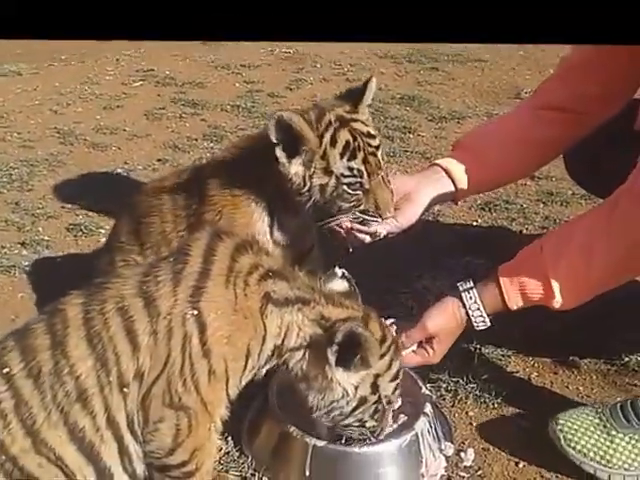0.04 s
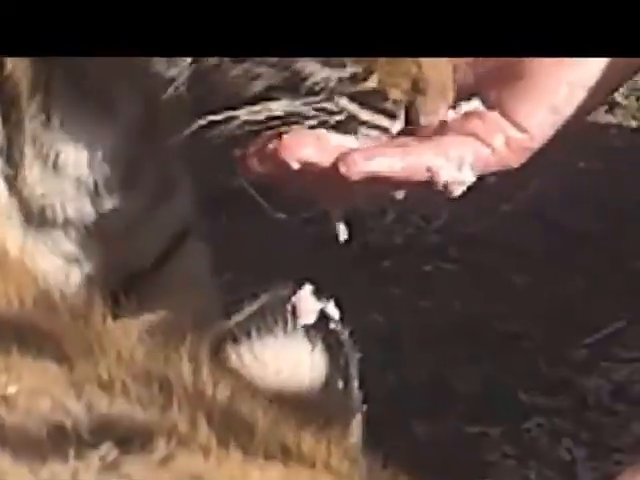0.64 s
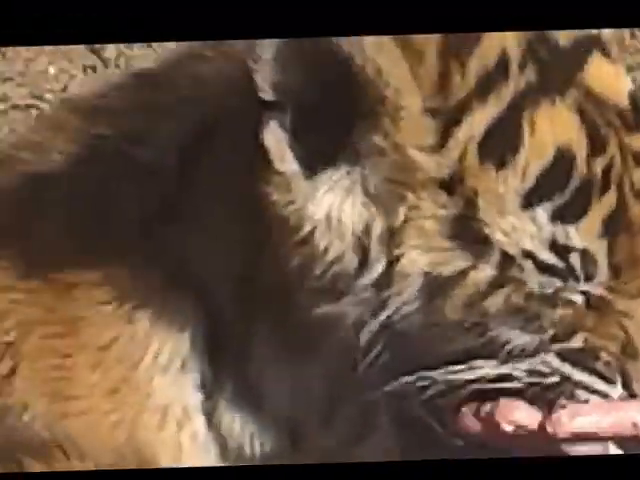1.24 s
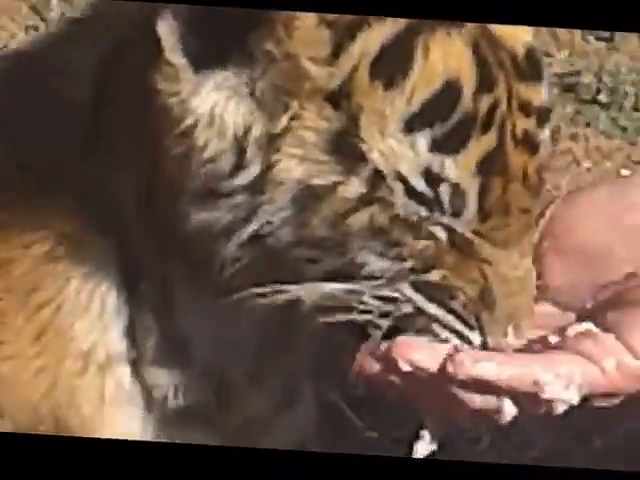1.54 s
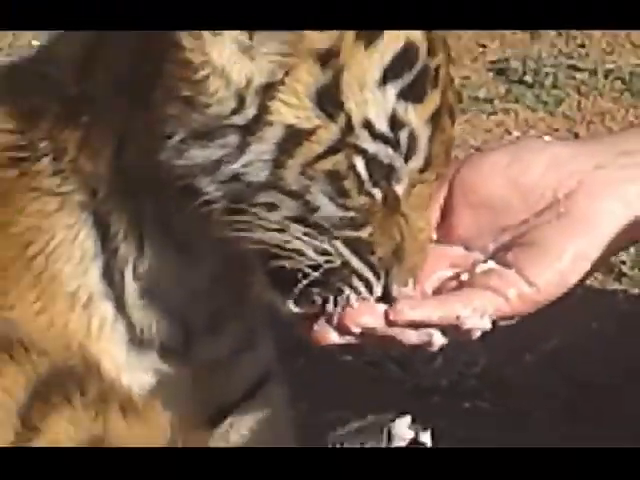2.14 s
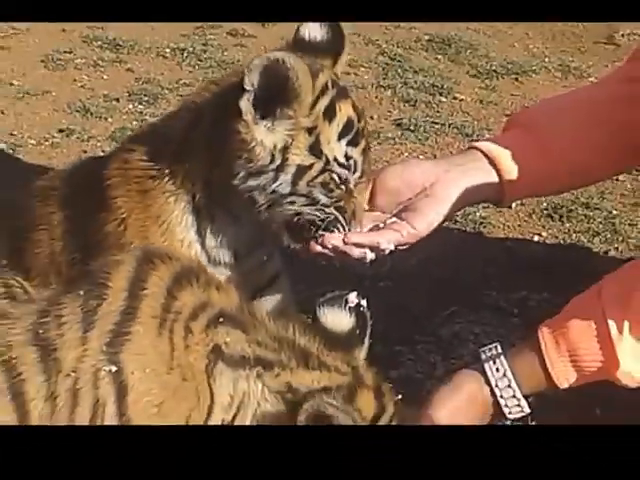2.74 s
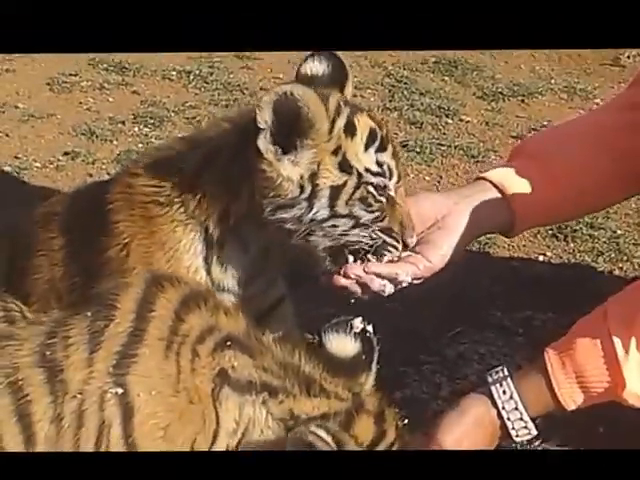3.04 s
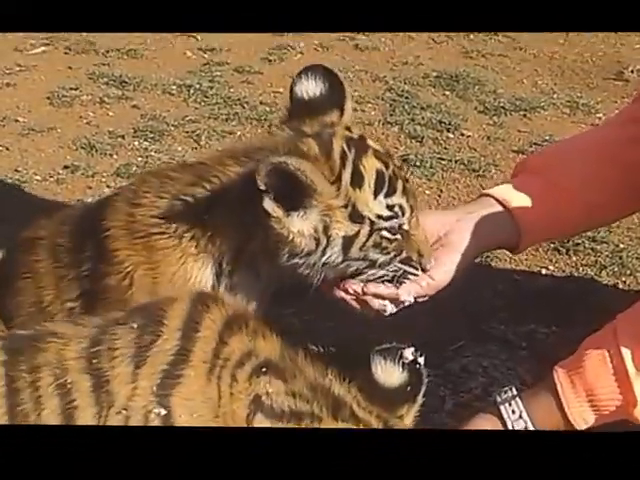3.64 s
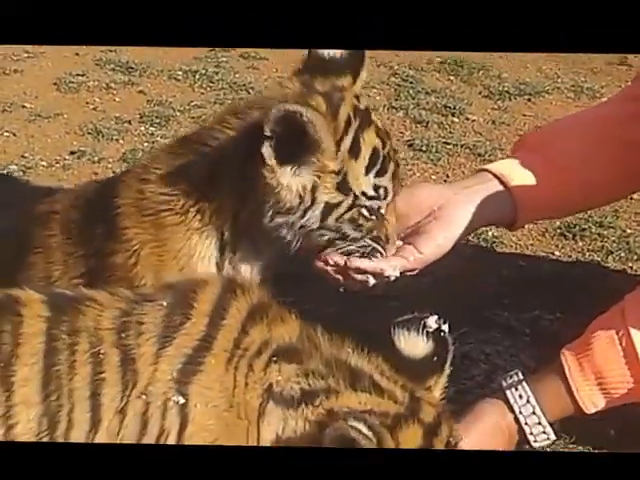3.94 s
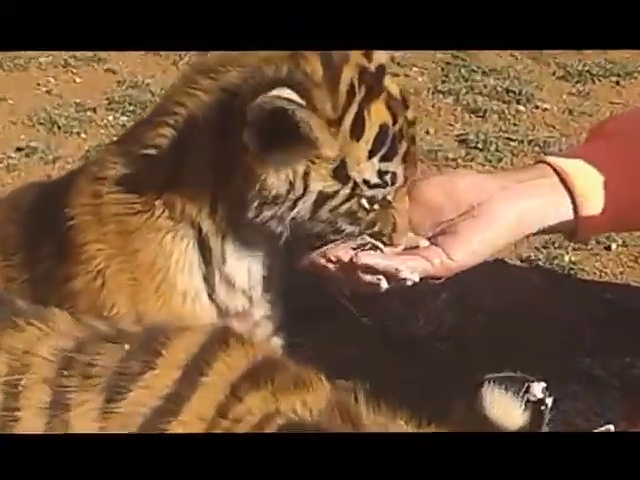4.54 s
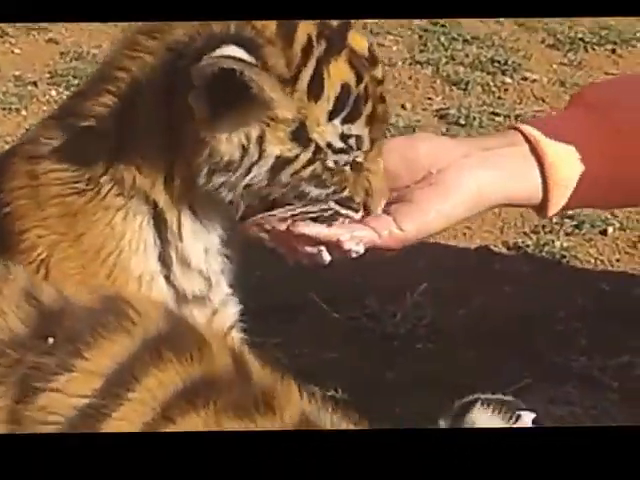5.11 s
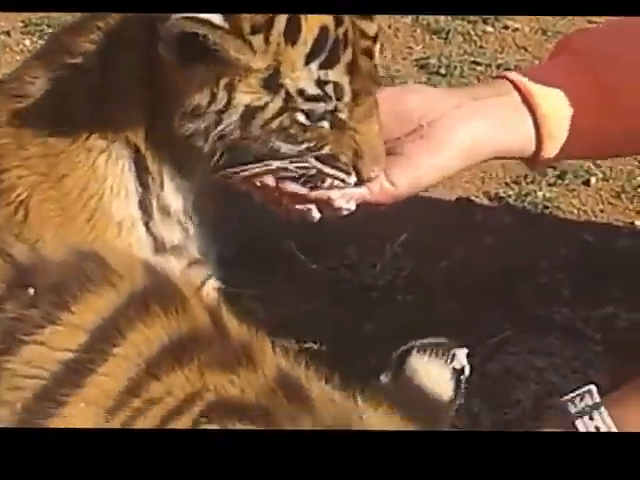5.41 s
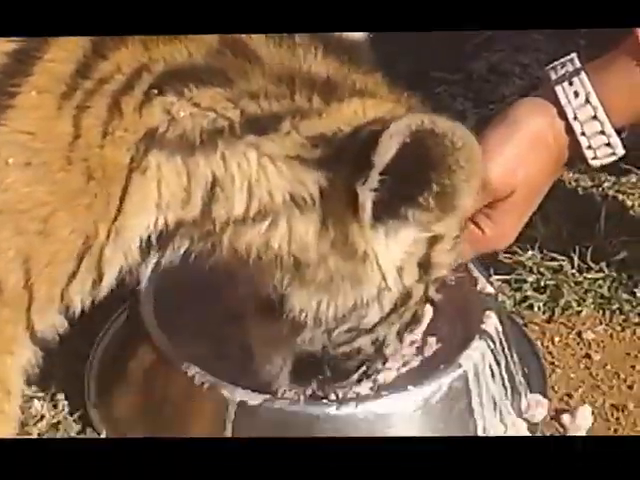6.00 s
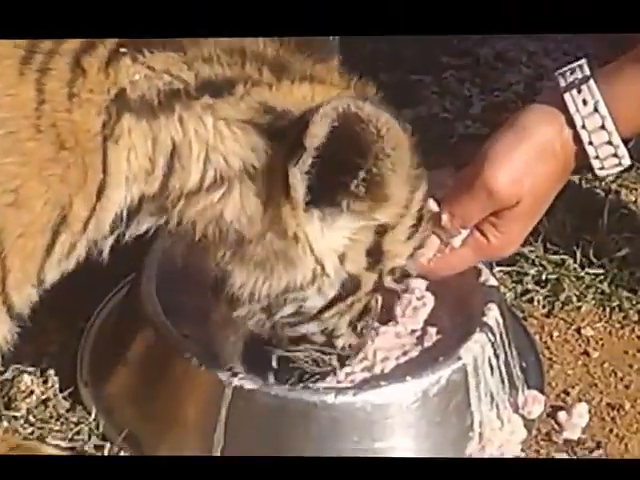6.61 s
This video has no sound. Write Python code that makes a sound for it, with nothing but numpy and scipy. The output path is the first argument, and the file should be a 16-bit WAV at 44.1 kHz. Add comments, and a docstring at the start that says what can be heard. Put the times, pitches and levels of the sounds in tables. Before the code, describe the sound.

Two tiger cubs moan and growl low while eating, with faint wet chewing clicks and a few harsh bird chirps outdoors.

```python
"""Outdoors, two tiger cubs feed on minced meat and growl, at times both at once.
One moans in an almost pure tone that frays at its end; the other growls lower and buzzier,
breaking into rasps as its vocal folds beat irregularly. Wet films snap in their mouths as clicks,
squelches and crackle, and air hisses over their teeth. Over a soft bed of air, a bird nearby gives
four harsh chirps, each two overlapping notes from the two sides of its syrinx."""
import sys
import numpy as np
from scipy import signal
from scipy.fft import rfft, irfft, next_fast_len
from scipy.io import wavfile
from scipy.ndimage import uniform_filter1d, map_coordinates

SR = 44100
rng = np.random.default_rng(int(sys.argv[2]) if len(sys.argv) > 2 else 0)


def persist_wave(psi):
    """Save psi, clipped to +-1, as 16-bit WAV."""
    counts = np.round(np.clip(psi, -1, 1) * 32767).astype(np.int16)
    wavfile.write(sys.argv[1], SR, np.atleast_2d(counts).T)


N = 298116

# Noise colours. Each row: frequency in Hz, relative level in dB.
AIR_COLOUR = [(15, -26), (25, -3.5), (71, 0), (148, 2), (233, -1.5), (350, -7), (941, -14), (1180, -19),
              (1310, -16.5), (2010, -19), (3350, -19), (4420, -23), (10800, -23), (14000, -77),
              (22000, -120)]  # the outdoor bed
RASP_COLOUR = [(120, -44), (180, 24), (225, 5), (285, 0.5), (350, 9), (410, 4), (520, 3), (680, 3),
               (820, -1.5), (1070, 3), (1330, -5.5), (1650, -16), (2500, -15), (5000, -34.5)]  # turbulence in the throat
TEETH_COLOUR = [(1060, -2.5), (1800, -3), (2290, -3), (2900, -4.5), (3750, -5), (6180, -8), (10400, -14),
                (10800, -20), (14000, -69), (22000, -120)]  # air over teeth and wet meat
# The cubs' phrases, one table each. Each row: time in seconds, pitch in Hz, fundamental level in dB,
# mouth level in dB before the phrase's trim.
FIRST_GROWL = [(0.01, 143.2, -26, -51), (.085, 134.3, -39.5, -59), (.12, 137.5, -31.5, -53),
               (.19, 134.2, -43, -59.5), (.24, 136, -38.5, -53.5), (.44, 124.5, -48.5, -52.5),
               (.545, 105.6, -34, -55.5), (.59, 104.7, -54, -68), (.72, 111.3, -53, -70)]
LONG_GROWL = [(2.58, 131.2, -59, -75.5), (2.672, 142.4, -39.5, -60.5), (2.76, 156.4, -29.5, -46.5),
              (2.834, 164.9, -38.5, -59), (2.878, 177.9, -36, -59), (2.96, 176.2, -37.5, -61.5),
              (2.976, 168.2, -37.5, -56.5), (3.046, 170, -36, -57), (3.074, 172.4, -33, -59.5),
              (3.234, 157.2, -25.5, -52), (3.366, 151.5, -27, -52.5), (3.666, 136, -38, -41.5),
              (3.69, 133.6, -49, -41.5), (3.72, 134.2, -31, -55.5)]
LAST_GROWL = [(5.4, 130.1, -56, -66), (5.57, 142.8, -38, -53.5), (5.65, 144.6, -40, -52),
              (5.88, 134.8, -44.5, -51.5), (5.98, 127.1, -43, -59.5), (6.07, 109.9, -37.5, -56),
              (6.15, 107, -36, -59.5), (6.26, 92.9, -47.5, -58)]
FIRST_MOAN = [(0.02, 207.4, -41, -65.5), (0.152, 206.7, -45.5, -57), (0.2, 187.0, -43.5, -54),
              (0.278, 196.7, -34.5, -46.5), (0.432, 189.8, -34, -51), (0.676, 167, -32, -60),
              (0.772, 154.4, -44.5, -60.5), (0.83, 150.1, -31, -56), (0.992, 143.6, -30, -60.5),
              (1.196, 142.4, -31, -56.5), (1.292, 150.5, -35.5, -54.5), (1.39, 146, -34, -56.5),
              (1.435, 140.2, -50, -65)]
SECOND_MOAN = [(4.32, 127.7, -74, -96), (4.368, 135.7, -53, -71), (4.41, 139.8, -44.5, -76),
               (4.488, 154.6, -40, -72), (4.518, 161.7, -50, -79), (4.622, 182.8, -38.5, -68),
               (4.704, 185, -58.5, -69.5), (4.88, 178.8, -58, -72.5), (4.92, 182.4, -59, -66.5)]
MOAN_AFTER_BREAK = [(4.94, 230.2, -49, -76), (4.956, 233, -46, -63), (5.146, 233.2, -41, -63),
                    (5.35, 226.9, -36.5, -58.5), (5.402, 199.8, -37, -60), (5.5, 187, -32, -60.5),
                    (5.724, 170.6, -32.5, -66), (5.834, 154.7, -41, -57.5), (5.96, 148.6, -29, -61.5),
                    (6.078, 145, -31, -58.5), (6.378, 145.3, -35, -58.5), (6.4, 149, -38, -58)]  # the second moan goes on after the voice breaks upward
# Spells of irregular fold beats. Each row: start in seconds, end in seconds, added roughness from 0 to 1.
GROWL_SPELLS = [(0, .53, 0.436), (2.8, 3.11, 0.84), (3.73, 4.1, 0.57), (5.38, 5.98, 0.059),
                (5.98, 6.3, 0.27)]
MOAN_SPELLS = [(0, .22, 0.57), (1.3, 1.41, 0.22), (1.41, 1.95, 0.61), (6.39, 6.8, 0.59)]
# Catches in which the throat briefly booms. Each row: time in seconds, boost in dB.
GROWL_BOOMS = [(2.99, 5.8), (3.16, 9.4), (3.79, 2.7), (3.88, 9.9)]
MOAN_BOOMS = [(1.23, 0), (1.53, 4.5), (6.25, 6)]
# Resonances of the cubs' throats and mouths and the bird's beak. Each row: frequency in Hz, gain in dB.
GROWL_THROAT_EQ = [(160, -38), (190, -9.5), (225, 2), (280, 7.5), (345, 7), (410, -3), (470, -9),
                   (560, -23), (700, -39.5)]
GROWL_MOUTH_EQ = [(400, -16), (470, -9), (560, -20), (625, -11), (668, 9), (700, 3), (740, -1), (800, -15),
                  (890, -17), (990, 0), (1085, 4.5), (1175, -3), (1240, -2), (1340, -4), (1550, -13),
                  (1900, -13), (2300, -26), (3000, -38)]
MOAN_THROAT_EQ = [(160, -31), (190, -14), (225, 11), (285, -2.5), (355, 4.5), (410, 0.5), (450, -11.5),
                  (560, -30), (700, -36.5)]
MOAN_MOUTH_EQ = [(440, -3.5), (590, -11), (700, -13), (790, -5.5), (900, -7.5), (1060, -2.5), (1170, -8),
                 (1300, -12), (1500, -10.5), (2000, -51), (3000, -44)]
BEAK_EQ = [(1000, -20), (1600, 1), (2350, 1.5), (2900, 3.5), (3900, 4.5), (4700, 3), (5500, 2.5),
           (6800, -0.5), (7700, -7), (8500, -12.5), (10000, -19)]
# The bird's chirps. Each row: start in seconds, level in dB, pitch ratio.
CHIRP_CUES = [(0.009, -43, .94), (0.54, -41.5, 0.99), (1.093, -43, 1.02), (1.754, -44.5, 0.97)]
# The two sides of the syrinx. Each row: time into the chirp in seconds, pitch in Hz before the chirp's
# ratio, relative level in dB, roughness from 0 to 1.
LEAD_NOTE = [(0, 1050, -16, .4), (.01, 1290, -6, .3), (.023, 1400, 0, .22), (.034, 1240, -1, .3),
             (.044, 1050, -1, .5), (.056, 830, -9, .7), (.066, 780, -40, .9)]
LAG_NOTE = [(.022, 1250, -30, .8), (.038, 1370, -7, .6), (.053, 1290, -1, .25), (.063, 1130, -3, .35),
            (.073, 1020, -10, .6), (.095, 950, -32, .9)]
# Squelches and licks. Each row: start and length in seconds, level in dB, centre in Hz, width in octaves.
LICK_CUES = [(0.451, 0.1, -54.5, 6640, 1), (1.546, 0.056, -65.5, 3630, 0.54),
             (2.122, 0.067, -75, 3270, 0.17), (2.26, 0.054, -66.5, 1100, 0.83),
             (2.406, 0.076, -71, 4670, 0.22), (2.58, 0.069, -71, 3100, 0.17),
             (4.02, 0.057, -63, 2270, 0.66), (4.221, 0.087, -71, 4800, 0.089),
             (4.956, 0.038, -54.5, 2260, 0.45), (5.169, 0.066, -58, 6200, 0.82),
             (5.819, 0.27, -60.5, 4470, 0.56), (6.055, 0.049, -57, 6500, 0.4)]
# Grumbles that end the moans and the long growl. Each row: start and length in seconds, pitch in Hz,
# share by which the pitch sinks, fundamental level in dB, mouth level in dB before the trim.
MOAN_TAILS = [(1.425, 0.37, 141.5, .04, -51, -56), (1.658, .13, 134.2, 0.28, -51, -71),
              (1.804, 0.15, 102.9, 0.051, -63, -66), (6.408, 0.23, 133, 0.025, -52, -55.5),
              (6.599, 0.12, 135.5, .27, -46, -61)]
GROWL_TAILS = [(3.7, 0.13, 120.1, .05, -36, -53), (3.8, 0.15, 115.1, 0.0068, -38.5, -53),
               (3.92, 0.14, 109.3, .06, -43, -60.5), (4.068, 0.29, 96.3, .04, -62, -77)]
# Tongue and lip clicks. Each row: start in seconds, peak level in dB, cavity resonance in Hz.
CLICK_CUES = [(2.0482, -57, 3100), (2.1146, -54, 3300), (2.14, -54, 3630), (2.3845, -53, 3760),
              (2.5768, -53, 3650), (2.602, -49.5, 3210), (4.0057, -42.5, 2060), (4.0233, -48, 2693),
              (4.0835, -48.5, 1850), (4.162, -50.5, 1720), (4.5248, -45.5, 2300), (4.9602, -46, 2160),
              (5.6057, -41, 1950)]


def amp(db):
    """Decibels as a linear gain."""
    return 10 ** (np.asarray(db) / 20)


def unit(x):
    """x at rms 1."""
    return x / np.sqrt(np.mean(x ** 2) + 1e-20)


def eq_gain(points, hz):
    """Linear gain of an EQ curve of (Hz, dB) points, read on a log frequency axis."""
    freqs, db = np.transpose(points)
    return amp(np.interp(np.log(hz + 1), np.log(freqs + 1), db))


def curves(rows, t):
    """Each column after the time, read at the times t."""
    times, *columns = np.transpose(rows)
    return [np.interp(t, times, column) for column in columns]


def wobble(rate, n):
    """A smooth random curve of n samples, with rate knots a second."""
    knots = rng.standard_normal(int(n * rate / SR) + 4)
    grid = np.arange(10 * len(knots)) / 10
    return np.interp(np.arange(n) * rate / SR, grid, map_coordinates(knots, [grid]))


def filtered(x, response):
    """x through a filter whose gain is response(Hz)."""
    size = next_fast_len(len(x) + 8192)
    return irfft(rfft(x, size) * response(np.fft.rfftfreq(size, 1 / SR)), size)[:len(x)]


def equalised(x, points):
    """x through an EQ curve of (Hz, dB) points."""
    return filtered(x, lambda hz: eq_gain(points, hz))


def coloured(x, points):
    """x through an EQ curve, at rms 1."""
    return unit(equalised(x, points))


def blend(tone, noise, share):
    """Equal-power crossfade from tone to noise."""
    share = np.clip(share, 0, 1)
    return np.sqrt(1 - share) * tone + np.sqrt(share) * noise


def add(track, start, sound):
    """Mix a sound into the track at start seconds."""
    part = track[max(0, round(start * SR)):][:len(sound)]
    part += sound[:len(part)]


def outdoor_air():
    """A soft, steady bed of noise, weighted to the low end."""
    return amp(-62.5) * coloured(rng.standard_normal(N), AIR_COLOUR)


def roughness(spells, t, calm=0.019, turn_s=0.019):
    """The folds slip into each rough spell and out of it again."""
    step = lambda s: .5 + .5 * np.tanh((t - s) / turn_s / 2)
    return np.clip(calm + sum(depth * (step(start) - step(end)) for start, end, depth in spells), 0, 1)


def cub_voice(phrase, spells, booms, throat_eq, mouth_eq, throat_trim_db, mouth_trim_db,
              buzz_db, rasp_db, mouth_leak, throat_leak, jitter, flutter_rate):
    """Vocal folds beat at the pitch, and stumble and hiss as they turn rough."""
    fade_s, boom_width_s = .015, .021
    start, end = phrase[0][0] - fade_s, phrase[-1][0] + fade_s
    t = np.arange(max(start, 0), end, 1 / SR)
    n = len(t)
    pitch, low_db, mouth_db = curves(phrase, t)
    rough = roughness(spells, t)
    phase = 2 * np.pi * np.cumsum(pitch * (1 + (0.0041 + jitter * rough) * wobble(120, n))) / SR

    def partial(k):
        """Irregular beats smear harmonic k into sidebands."""
        scatter = (wobble(flutter_rate, n) + 1j * wobble(flutter_rate, n)) / np.sqrt(2)
        flutter = np.sqrt(1 - rough ** 2) + rough * scatter
        return np.sqrt(2) * np.imag(flutter * np.exp(1j * k * phase))

    def puffs(colour):
        """Air escapes in one puff a cycle."""
        return coloured((1 + 0.53 * np.cos(phase)) * rng.standard_normal(n), colour)

    # the throat favours whichever low harmonic is nearest its resonance
    weights = {k: eq_gain(throat_eq, k * pitch) for k in range(2, 5)}
    hum = sum(w * partial(k) for k, w in weights.items())
    hum /= np.sqrt(sum(w ** 2 for w in weights.values()))
    throat = blend(hum, 0.77 * puffs(throat_eq), throat_leak + 0.68 * rough)
    # its level mostly rides the mouth's, and swells when rough
    throat_db = throat_trim_db + 0.2 * low_db + 0.8 * mouth_db + 10.5 * rough
    throat_db += sum(db * np.exp(-.5 * ((t - s) / boom_width_s) ** 2) for s, db in booms)
    # higher harmonics light up as they glide through the mouth's resonances
    buzz = np.zeros(n)
    for k in range(3, 18):
        jaw = amp(2.6 * wobble(12, n))  # chewing sways each harmonic's level
        blur = rng.uniform(0, 2 * np.pi) + .035 * k * wobble(110, n)  # no two beats are quite alike
        buzz += eq_gain(mouth_eq, k * pitch) * jaw * np.sin(k * phase + blur)
    mouth = blend(amp(buzz_db) * buzz, amp(rasp_db) * puffs(RASP_COLOUR), mouth_leak + 0.71 * rough)
    voice = amp(low_db) * partial(1) + amp(throat_db) * throat + amp(mouth_db + mouth_trim_db) * mouth
    throb_hz = 24 * (1 + 0.13 * wobble(8.36, n))
    throb = amp(2.4 * rough * np.sin(2 * np.pi * np.cumsum(throb_hz) / SR))
    fade = np.clip(np.minimum(t - start, end - t) / fade_s, 0, 1)
    out = np.zeros(N)
    add(out, t[0], fade * throb * voice)
    return out


def growl(phrase, throat_trim_db, mouth_trim_db):
    """The growler's more open mouth lets a buzz of harmonics out."""
    return cub_voice(phrase, GROWL_SPELLS, GROWL_BOOMS, GROWL_THROAT_EQ, GROWL_MOUTH_EQ,
                     throat_trim_db, mouth_trim_db, buzz_db=-6.5, rasp_db=10,
                     mouth_leak=0.0041, throat_leak=0.023, jitter=0.0303, flutter_rate=70)


def moan(phrase, throat_trim_db, mouth_trim_db):
    """The moaner's mouth is nearly shut: mostly fundamental, with a breathy edge."""
    return cub_voice(phrase, MOAN_SPELLS, MOAN_BOOMS, MOAN_THROAT_EQ, MOAN_MOUTH_EQ,
                     throat_trim_db, mouth_trim_db, buzz_db=-0.5, rasp_db=4.5,
                     mouth_leak=0.31, throat_leak=0.56, jitter=0.035, flutter_rate=64)


def teeth_hiss(voices):
    """Air over teeth and wet meat: a grainy hiss that grows with the sound leaving the mouths."""
    mouth_band = coloured(voices, [(350, -40), (600, 0)])
    power = np.abs(uniform_filter1d(mouth_band ** 2, size=SR // 10))
    effort_db = 10 * np.log10(power + amp(-92))
    grains = rng.standard_normal(N) * amp(2.4 * wobble(700, N))
    return amp(-64 + 0.36 * effort_db) * coloured(grains, TEETH_COLOUR)


def saliva_crackle(snaps_per_s=20, t60=0.024):
    """Threads of saliva snap at random while the cubs chew."""
    out, t = np.zeros(N), np.arange(SR // 50) / SR
    for when, softness in rng.random((round(snaps_per_s * N / SR), 2)):
        db = -53.5 - 2.5 * np.log(softness + .05)
        add(out, when * N / SR, amp(db - 60 * t / t60) * rng.standard_normal(len(t)))
    return equalised(out, [(800, -25), (2200, -9.5), (6000, -6.5), (10000, -7)])


def syrinx(note, ratio, jitter):
    """One side of the syrinx sings a harsh, arching stack of harmonics that breaks up as it falls."""
    n = round(.1 * SR)
    pitch, db, rough = curves(note, np.arange(n) / SR)
    pitch = ratio * pitch * (1 + 0.0121 * wobble(80, n) + jitter * rough * wobble(1520, n))
    phase = 2 * np.pi * np.cumsum(pitch) / SR
    stack = sum(eq_gain(BEAK_EQ, k * pitch) * amp(2.64 * wobble(170.5, n)) * np.sin(k * phase)
                for k in range(1, 9))
    return amp(db) * blend(unit(stack), coloured(rng.standard_normal(n), BEAK_EQ), rough ** 2)


def bird(echo_db=-11, t60=0.4, predelay_s=.008):
    """Two overlapping notes a chirp, scattered by the ground and trees."""
    out, t = np.zeros(N), np.arange(SR // 2) / SR
    for start, db, ratio in CHIRP_CUES:
        chirp = amp(db) * (syrinx(LEAD_NOTE, ratio, jitter=0.056) + syrinx(LAG_NOTE, ratio, jitter=0.071))
        tail = rng.standard_normal(len(t)) * amp(-60 * t / t60)
        echo = signal.fftconvolve(chirp, tail / np.linalg.norm(tail))
        add(out, start, chirp)
        add(out, start + predelay_s, amp(echo_db) * echo)
    return out


def mouth_cavity(x, centre_hz, octaves):
    """The hollow of the mouth rings in one bell-shaped band, returned at rms 1."""
    return unit(filtered(x, lambda hz: np.exp(-.5 * (np.log2((hz + 1) / centre_hz) / octaves) ** 2)))


def licks():
    """Each squelch is a swarm of tiny wet snaps that swells and fades."""
    out = np.zeros(N)
    for start, length, db, hz, octaves in LICK_CUES:
        n = round(length * SR)
        snaps = rng.standard_normal(n) * amp(2 * wobble(300, n))
        swell = np.sin(np.pi * np.arange(n) / n)
        add(out, start, amp(db) * swell * mouth_cavity(snaps, hz, octaves))
    return out


def grumble(start, length, hz, sink, low_db, mouth_db):
    """The phrase of a voice running out of air: pitch and levels hold, then give way together."""
    progress = np.linspace(0, 1, 10)
    spent = progress ** 2.9
    lost_db = 11 * spent
    times = start + length * progress
    return np.transpose([times, hz * (1 - sink * spent), low_db - lost_db, mouth_db - lost_db])


def mouth_clicks(attack_s=0.0011, t60=0.026):
    """Wet films snap on tongue and lips and briefly ring the mouth cavity."""
    out, t = np.zeros(N), np.arange(SR // 10) / SR
    envelope = (1 - np.exp(-t / attack_s)) * amp(-60 * t / t60)
    for start, db, hz in CLICK_CUES:
        ring = mouth_cavity(rng.standard_normal(len(t)), hz, octaves=0.18)
        spit = coloured(rng.standard_normal(len(t)), [(500, -5), (1800, 0), (4500, -3.5), (10000, -13.5)])
        click = envelope * (ring + .38 * spit)
        add(out, start, amp(db) * click / np.abs(click).max())
    return out


def whine(start_s=4.58, end_s=4.965, attack_s=0.036, release_s=0.062):
    """A thin tone an octave above the second moan, swelling until the voice breaks."""
    t = np.arange(start_s, end_s, 1 / SR)
    pitch = 2 * curves(SECOND_MOAN, t)[0] * (1 + 0.015 * wobble(60, len(t)))
    tone = unit(np.sin(2 * np.pi * np.cumsum(pitch) / SR))
    gate = np.clip(np.minimum((t - start_s) / attack_s, (t[-1] - t) / release_s), 0, 1)
    swell_db = np.linspace(-60, -51.5, len(t)) + 0.5 * wobble(27.3, len(t))
    out = np.zeros(N)
    add(out, start_s, gate * amp(swell_db) * tone)
    return out


def cubs():
    """Both voices on one bus; small bodies radiate almost nothing below their lowest pitch."""
    voices = moan(FIRST_MOAN, throat_trim_db=-4, mouth_trim_db=-2.5)
    voices += moan(SECOND_MOAN, throat_trim_db=0.5, mouth_trim_db=3)
    voices += moan(MOAN_AFTER_BREAK, throat_trim_db=-6, mouth_trim_db=-1)
    voices += growl(FIRST_GROWL, throat_trim_db=2, mouth_trim_db=-1)
    voices += growl(LONG_GROWL, throat_trim_db=1, mouth_trim_db=-1)
    voices += growl(LAST_GROWL, throat_trim_db=5, mouth_trim_db=-2.5)
    voices += sum(moan(grumble(*row), throat_trim_db=-2, mouth_trim_db=-.5) for row in MOAN_TAILS)
    voices += sum(growl(grumble(*row), throat_trim_db=1.5, mouth_trim_db=-1) for row in GROWL_TAILS)
    return equalised(voices + whine(), [(65, -23.5), (84, -18), (100, 0)])


def scene():
    """The mono mix: cubs up front, wet mouth detail and the bird over the bed of air."""
    air = outdoor_air()
    voices = cubs()
    return (air + voices + teeth_hiss(voices) + mouth_clicks() + licks() + bird() + saliva_crackle())[None]


def record(dry):
    """A brick-wall low-pass takes off the very top."""
    return filtered(dry[0], lambda hz: hz < 10930)[None]


dry = scene()
out = record(dry)
persist_wave(out)
```